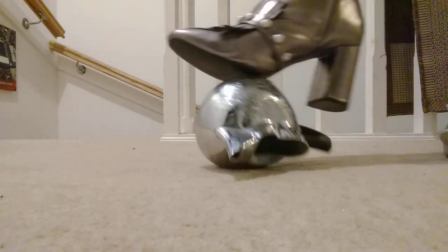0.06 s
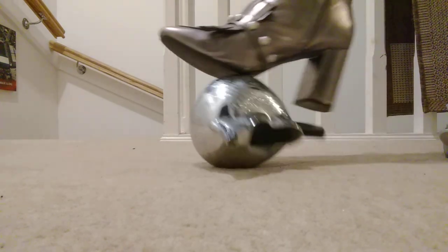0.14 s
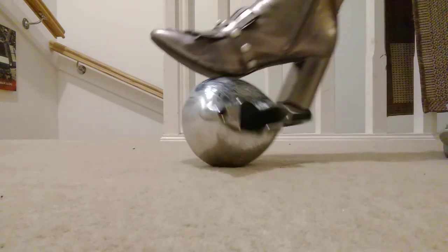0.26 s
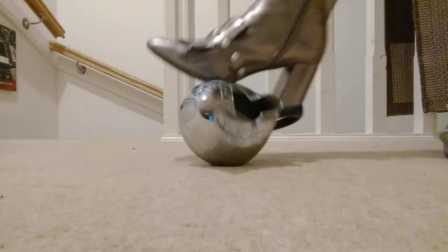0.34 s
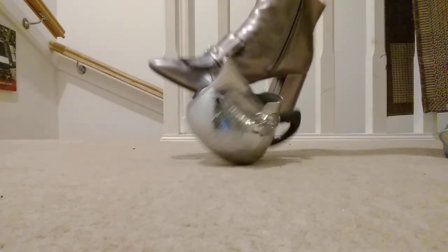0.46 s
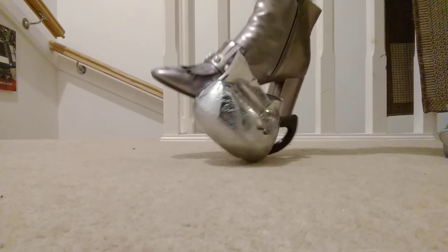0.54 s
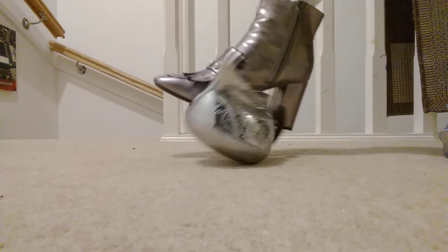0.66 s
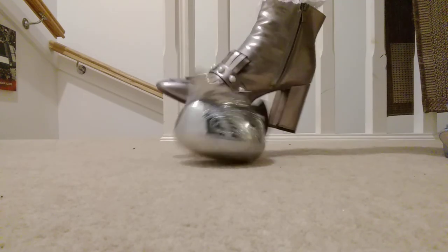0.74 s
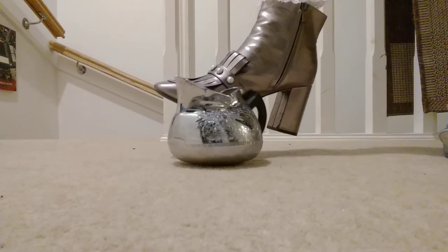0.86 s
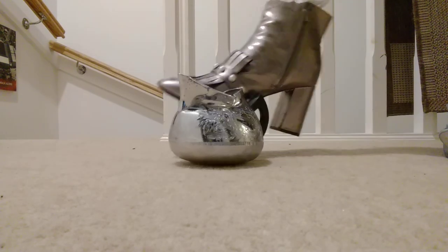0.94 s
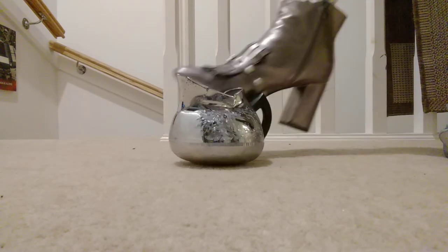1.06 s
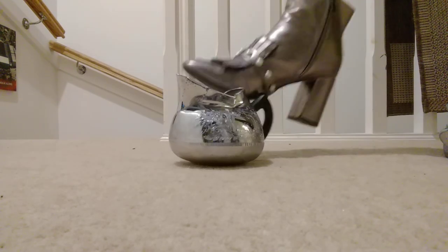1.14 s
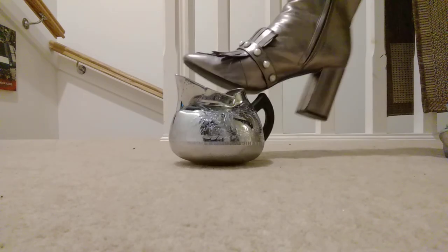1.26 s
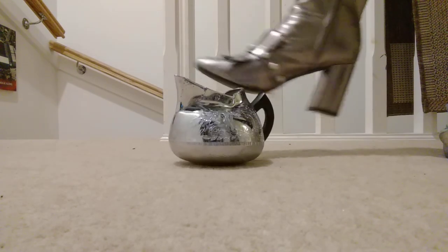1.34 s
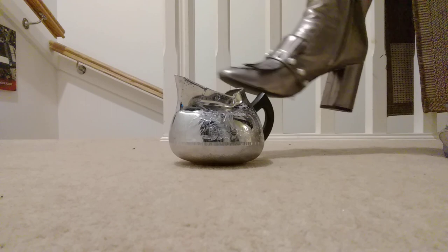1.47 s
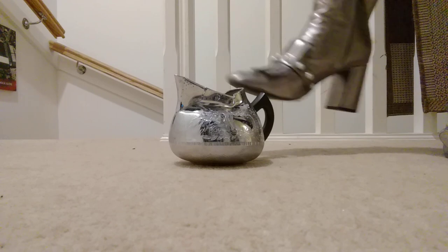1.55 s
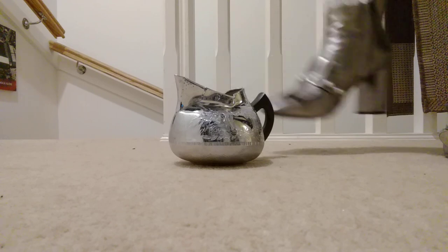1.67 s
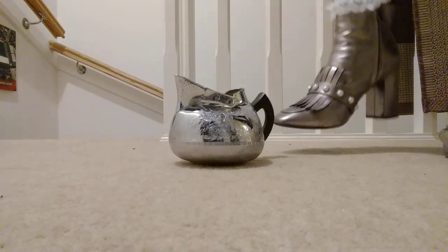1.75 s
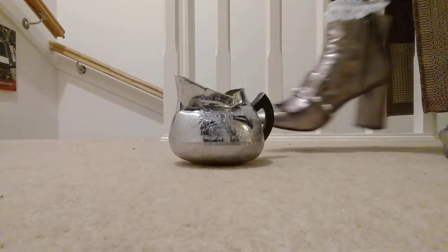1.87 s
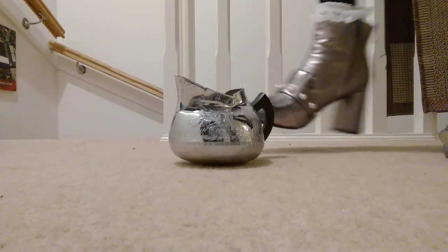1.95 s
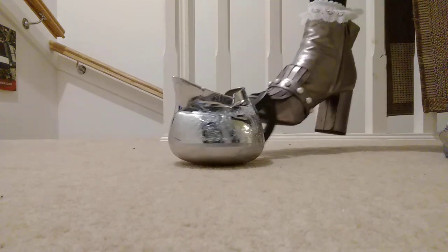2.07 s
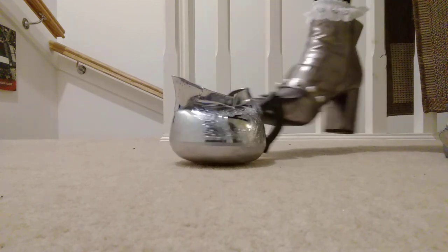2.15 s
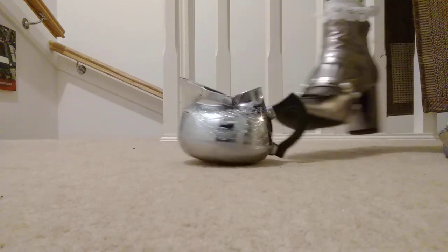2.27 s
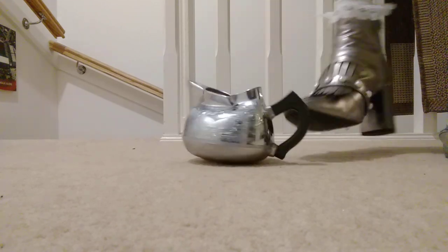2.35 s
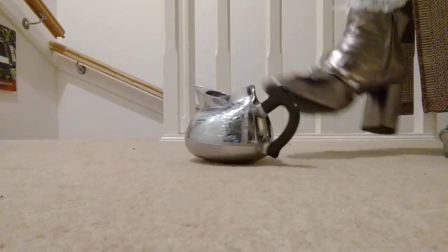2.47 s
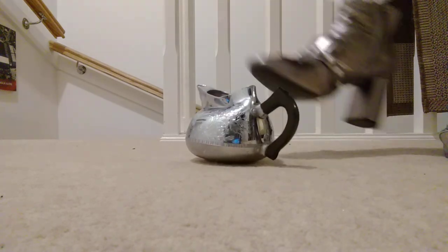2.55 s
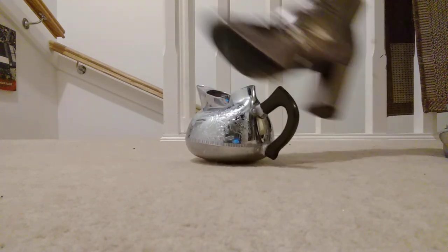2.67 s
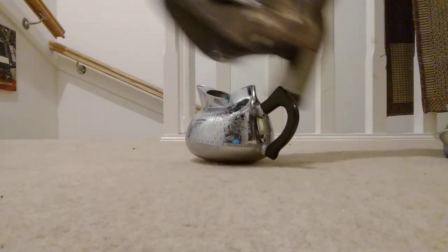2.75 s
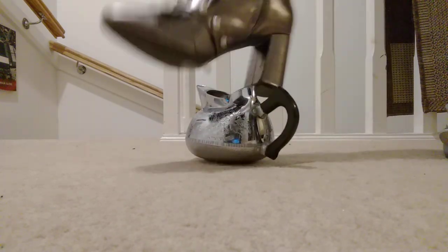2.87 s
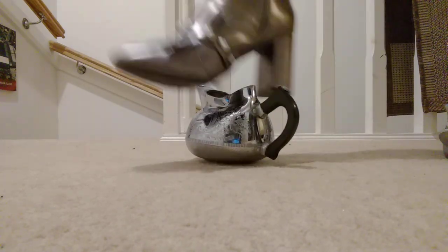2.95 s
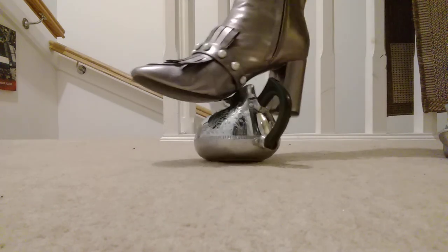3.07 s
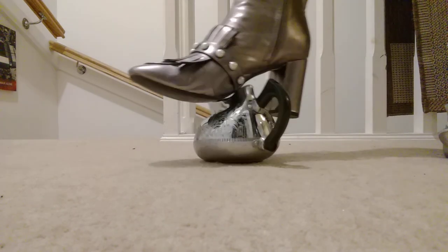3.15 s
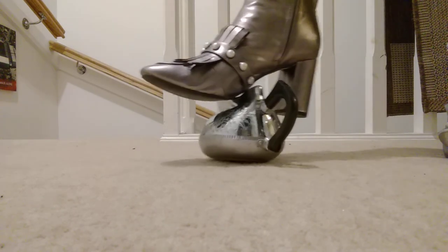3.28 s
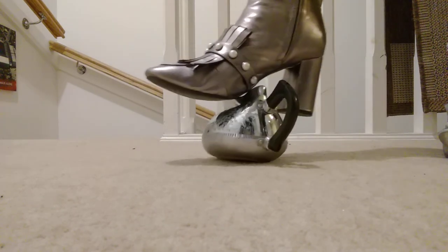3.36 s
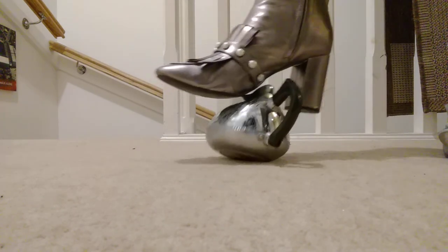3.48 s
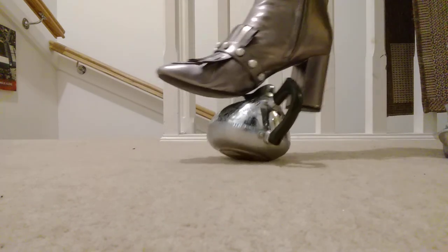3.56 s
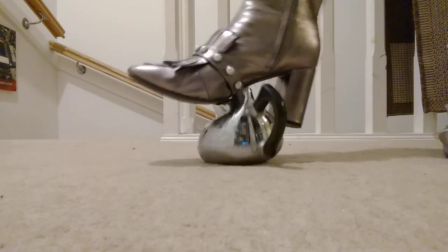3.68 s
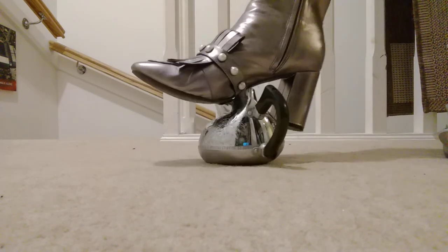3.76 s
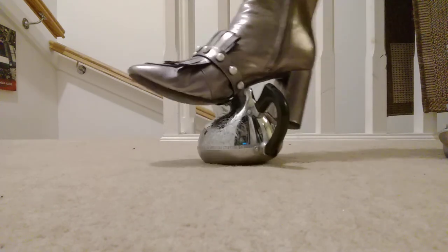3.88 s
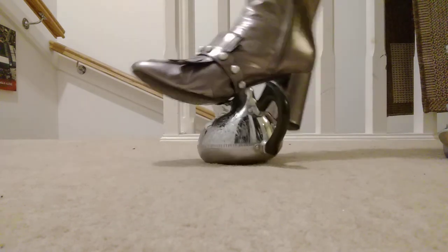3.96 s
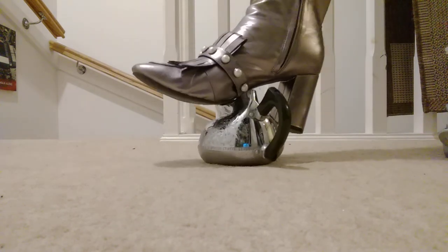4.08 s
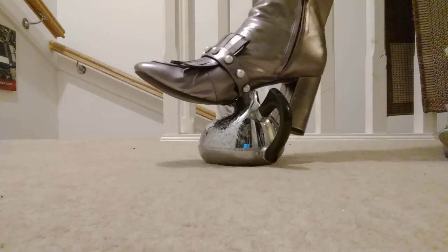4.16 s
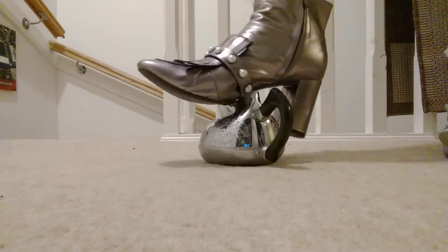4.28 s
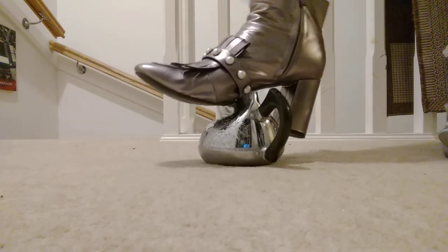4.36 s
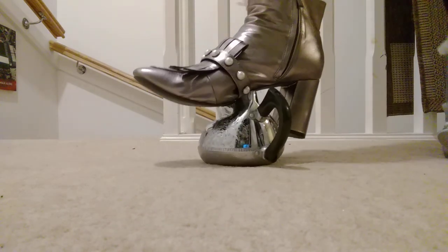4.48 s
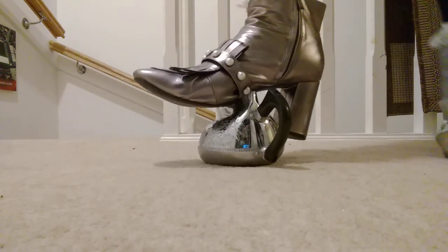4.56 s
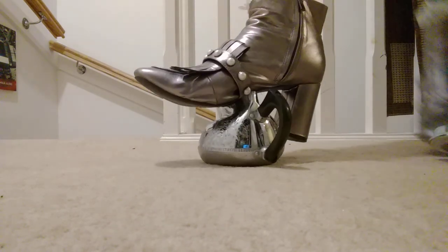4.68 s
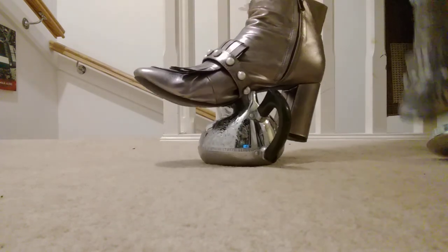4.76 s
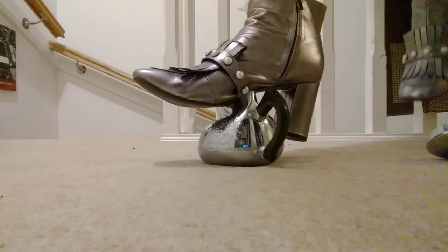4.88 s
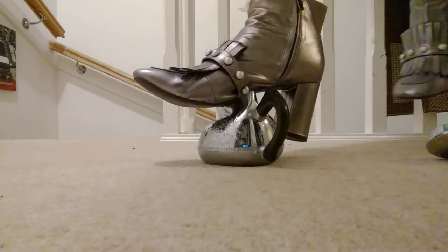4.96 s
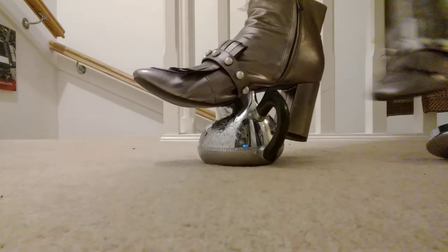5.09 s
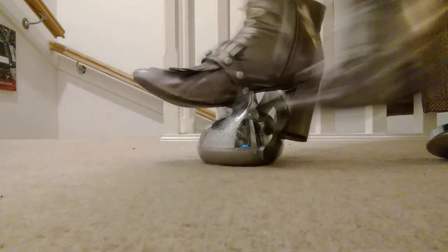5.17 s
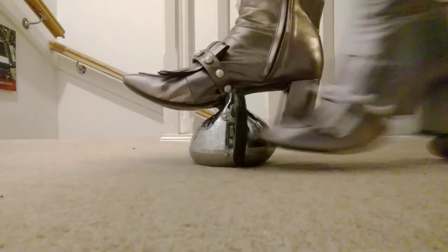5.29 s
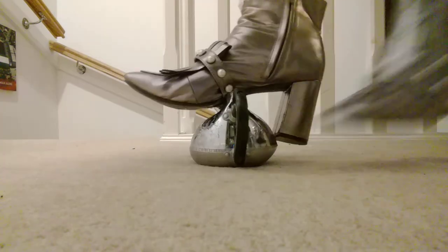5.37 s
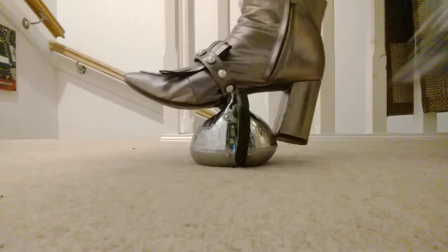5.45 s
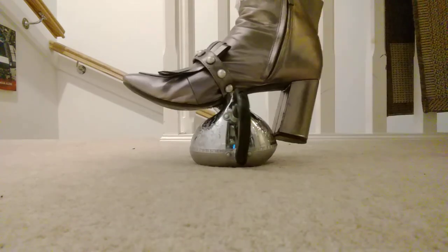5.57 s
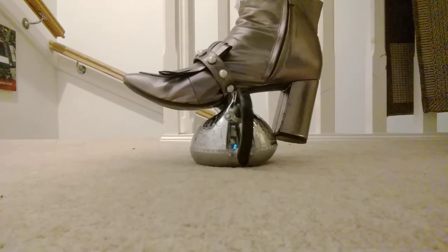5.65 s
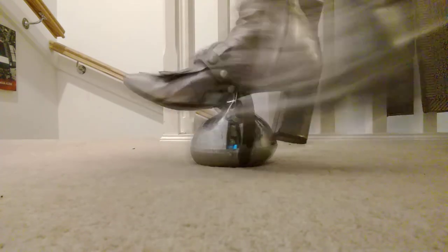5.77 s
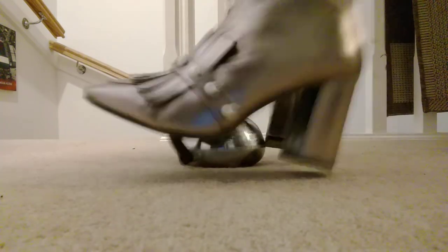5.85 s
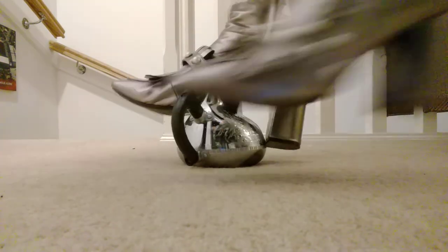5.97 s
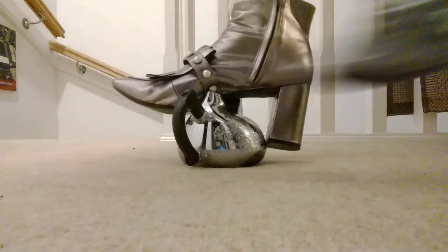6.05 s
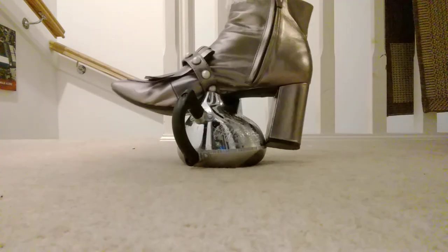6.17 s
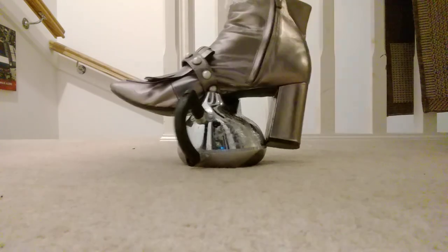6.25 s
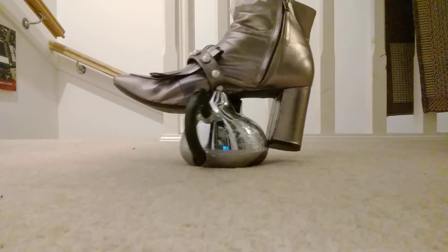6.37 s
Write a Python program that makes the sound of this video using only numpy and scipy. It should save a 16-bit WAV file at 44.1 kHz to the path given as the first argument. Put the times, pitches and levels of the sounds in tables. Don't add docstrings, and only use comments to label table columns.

```python
import sys
import numpy as np
from scipy import signal
from scipy.fft import rfft, irfft
from scipy.io import wavfile
from scipy.ndimage import uniform_filter1d

SR = 44100
rng = np.random.default_rng(int(sys.argv[2]) if len(sys.argv) > 2 else 0)


def put_to_file(sound):
    columns = np.atleast_2d(sound).T
    safe = np.clip(columns, -1, 1)
    whole_steps = np.round(safe * 32767)
    wavfile.write(sys.argv[1], SR, whole_steps.astype(np.int16))


def attenuation_scalar(level_db):
    decades = np.asarray(level_db, float) / 20
    return 10 ** decades


N = 283122


def blows(rows, modes, knock_s, thump_hz, thump_s, thump_width_s, boom_hz, boom_db, rise_cycles):
    out = np.zeros(N)
    for s, tick_db, knock_db, thump_db, ring_db in rows:
        add(out, s, tick(tick_db, 0.004))
        add(out, s + 0.0034, tick(tick_db - 16.5, 0.012))
        add(out, s, attenuation_scalar(knock_db + 2.0) * wavelet(1143, knock_s, 0.00064, 0.26))
        add(out, s, attenuation_scalar(thump_db + 4.5) * wavelet(thump_hz, thump_s, thump_width_s, 0.099))
        add(out, s, attenuation_scalar(thump_db + boom_db) * wavelet(boom_hz, 0.009, 0.0035, 0.2))
        add(out, s, attenuation_scalar(ring_db) * ringing(modes, rise_cycles))
    return out


FREE_HZ = [446, 797, 1194, 1508, 1672, 2290, 2390, 3130, 3910, 5240, 5669]
# (level [dB], t60 [s])
FREE_RING = [(2.5, 0.13), (-12, 0.35), (-1, 0.26), (-6, 0.19), (-1, 0.24), (7, 0.086), (-31, 0.24),
             (-9, 0.1), (-11.5, 0.071), (-24, 0.17), (-20, 0.14)]


def free_pot():
    return [(hz, *ring) for hz, ring in zip(FREE_HZ, FREE_RING)]


# (time [s], tick [dB], knock [dB], thump [dB], ring [dB])
FREE_BLOWS = [
    (0.738, -10.5, -24, -29, -30),
]


def free_blows():
    return blows(FREE_BLOWS, free_pot(), 0.00172, 373, 0.004, 0.00062, 165, -1.8, 0.36)


# (time [s], tick [dB], knock [dB], thump [dB], ring [dB])
RIM_BLOWS = [
    (0.9954, -9.5, -30.5, -46.5, -26),
]
RIM_HZ = [440, 797, 1500, 1742, 3066, 3606, 3872, 4700, 5158, 6035, 6346, 6690, 7492, 8870]
# (level [dB], t60 [s])
RIM_RING = [(-23.5, 0.15), (-20.5, 0.49), (-6, 0.035), (-17, 0.29), (-6.5, 0.25), (-11, 0.07), (-18, 0.2),
            (-5, 0.076), (-11.5, 0.18), (-12.5, 0.27), (-18, 0.11), (-12, 0.11), (-14, 0.23), (-2, 0.036)]


def rim_blows():
    rim = [(hz, *ring) for hz, ring in zip(RIM_HZ, RIM_RING)]
    return blows(RIM_BLOWS, rim, 0.00108, 590, 0.004, 0.00048, 210, -3.0, 0.44)


# (time [s], tick [dB], knock [dB], thump [dB], ring [dB])
PINNED_BLOWS = [
    (2.9705, -28, -29.5, -25, -37),
    (3.019, 3.5, -25.5, -25.5, -25.5),
    (3.5826, -28.5, -35, -43, -38.5),
    (3.6536, -1.5, -19, -11, -21),
]
# (frequency [Hz], level [dB], t60 [s])
PINNED_POT = [(82, -1.5, .18), (144, -4, 0.24), (389.8, -7, 0.4), (429, -10, 0.1), (393.8, 4, 0.081),
              (698, -4.5, 0.099), (1010, -13.5, 0.048)]


def pinned_blows():
    return blows(PINNED_BLOWS, PINNED_POT, 0.00121, 403.6, 0.00452, 0.0025, 130, 0.3, 0.53)


# (time [s], tick [dB], knock [dB], thump [dB], ring [dB])
KICKS = [
    (5.1648, 8, -10, -15.5, -36),
    (5.2792, -27, -45, -44, -43.5),
    (5.7632, 4, -9, -15, -26.5),
]
# (frequency [Hz], level [dB], t60 [s])
KICKED_POT = [(84, -3, 0.27), (145, -4.5, 0.23), (236.6, -2.5, 0.35), (332, -7.5, 0.29), (527, -6.5, 0.11),
              (782, -11, 0.1), (1010, -16, 0.039), (1160, -19, 0.059)]


def kick_blows():
    return blows(KICKS, KICKED_POT, 0.0015, 410, 0.0074, 0.0004, 175, -0.5, 2.2)


def ringing(modes, rise_cycles):
    t = np.arange(SR // 2) / SR
    out = np.zeros(len(t))
    for hz, db, t60 in modes:
        decay = attenuation_scalar(db - 60 * t / t60)
        swell = 1 - np.exp(-t * hz / rise_cycles)
        beating = 1 + 0.35 * np.cos(2 * np.pi * hz * 0.013 * t)
        out += decay * swell * np.sin(2 * np.pi * hz * t) * beating
    return out


def wavelet(hz, peak_s, width_s, glide):
    t = np.arange(SR // 20) / SR
    shape = (t / peak_s) ** (peak_s / width_s) * np.exp((peak_s - t) / width_s)
    bend = 1 - glide * np.tanh((t - peak_s) / peak_s)
    return shape * np.cos(2 * np.pi * hz * (t - peak_s) * bend)


# (frequency [Hz], level [dB])
TICK = [(1000, -33), (3000, -22.5), (6000, -28), (9000, -13), (10500, -4), (13500, 0.5), (14500, -1.5),
        (16200, -1)]


def tick(db, t60):
    t = np.arange(1024) / SR - 0.0009
    fade_db = -60 * np.where(t > 0, t / t60, -t / 0.0014)
    burst = coloured(rng.standard_normal(1024) * attenuation_scalar(fade_db), TICK)
    burst *= signal.windows.tukey(1024, 0.04)
    return attenuation_scalar(db) * burst / abs(burst).max()


# (time [s], level [dB], t60 [s], centre [Hz])
CLATTER = [(0.7372, -35.5, 0.3, 1548), (.995, -26, 0.2, 7070), (2.969, -33, 0.1, 2770),
           (3.0184, -18, 0.02, 3100), (3.049, -32.5, 0.15, 8160), (3.583, -38, 0.077, 2260),
           (3.654, -33, 0.08, 1160), (5.169, -20.5, 0.023, 870), (5.253, -54, .04, 5000),
           (5.279, -41.5, 0.072, 900), (5.765, -14, 0.042, 904), (5.1649, -18.5, 0.011, 2720),
           (5.168, -12, .02, 560), (5.766, -16.5, 0.017, 560), (3.164, -32.5, 0.016, 9000),
           (3.6522, -30, 0.023, 2960), (2.9965, -38, 0.053, 4500), (3.031, -32.5, 0.091, 5500)]


def clatter():
    out, t = np.zeros(N), np.arange(SR // 2) / SR
    f = np.geomspace(100, 20000, num=30)
    for s, db, t60, hz in CLATTER:
        spread, strength, life = rng.standard_normal((3, 70))
        noise, grain = rng.standard_normal((2, len(t)))
        grains = attenuation_scalar(2.5 * evened(uniform_filter1d(grain, 70)))
        hump = np.c_[f, -9.0 * np.log(f / hz) ** 2]
        crunch = evened(coloured(noise * grains, hump))
        crunch = crunch * attenuation_scalar(-60 * t / t60) * np.minimum(t / 0.00029, 1)
        if s < 2:
            crowd_hz = 11000 * np.tanh(hz * np.exp(0.67 * spread) / 11000)
            crowd_t60 = t60 * np.exp(np.tanh(life) / 2)
            crowd = ringing(zip(crowd_hz, 1.9 * strength, crowd_t60), 1.5)
            crunch = crunch + 2.0 * crowd / abs(crowd).max()
        add(out, s, attenuation_scalar(db - 7.5) * crunch)
    return out


# (time [s], level [dB], frequency [Hz])
CRACKS = [
    (2.972, -39, 3100),
    (3.0192, -29, 3230),
    (3.5826, -44, 3300),
    (3.6556, -23, 2590),
    (5.1653, -15, 2670),
    (5.252, -57, 3500),
    (5.281, -58, 3220),
    (5.7638, -22.5, 2590),
]


def cracks():
    out = np.zeros(N)
    for s, db, hz in CRACKS:
        add(out, s, attenuation_scalar(db) * wavelet(hz, 0.0007, 0.0005, 0.05))
    return out


# (time [s], tick [dB], knock [dB])
CLICKS = [(1.1087, -53, -39), (1.42, -32.5, -68), (1.8008, -28, -63), (1.8104, -32.5, -45),
          (1.8748, -31, -56), (1.9495, -25.5, -52), (2.7777, -41, -51), (2.8734, -20.5, -38.5),
          (3.0443, -19.5, -30.5), (3.1492, -32, -50), (3.1643, -30, -35), (3.749, -46, -41.5),
          (3.8183, -38, -46), (4.013, -33, -49), (4.0234, -65, -43), (4.1764, -36, -55),
          (4.2905, -30, -53.5), (5.1951, -38.5, -43), (5.2525, -24.5, -55.5), (5.3093, -28, -44)]


def clicks():
    out = np.zeros(N)
    for s, tick_db, knock_db in CLICKS:
        add(out, s, tick(tick_db, 0.015))
        add(out, s, attenuation_scalar(knock_db - 6) * wavelet(1150, 0.0013, 0.0027, 0.095))
    return out


SINGING_S = [5.29, 5.31, 5.3, 5.278, 5.312, 3.044, 2.975, 1.15]
SINGING_HZ = [1529, 2756, 4630, 2080, 2060, 10550, 1198, 11682]
# (level [dB], swell [s], t60 [s])
SINGING = [
    (-55, 0.14, 0.3),
    (-54, 0.022, 0.25),
    (-50, 0.013, 0.2),
    (-50.5, 0.0081, 0.12),
    (-52, 0.0055, 0.05),
    (-27, .004, 0.081),
    (-27, 0.0029, 0.057),
    (-67, 0.28, 7.2),
]


def singing():
    out, t = np.zeros(N), np.arange(SR) / SR
    for s, hz, (db, swell, t60) in zip(SINGING_S, SINGING_HZ, SINGING):
        rise = np.minimum(t / swell, 1)
        decay = attenuation_scalar(db - 60 * np.maximum(t - swell, 0) / t60)
        fade = signal.windows.tukey(SR, 0.2 * (t60 > 2))
        add(out, s, rise * decay * fade * np.sin(2 * np.pi * hz * t))
    return out


# (time [s], peak [dB], frequency [Hz], t60 [s])
BUMPS = [
    (2.034, -43, 410, 0.033),
    (4.067, -28.5, 156, 0.031),
    (4.241, -40, 145, 0.3),
    (4.304, -28, 126, 0.075),
    (4.538, -28, 148, 0.038),
    (5.634, -45, 108.6, 0.067),
]


def bumps():
    out = np.zeros(N)
    for s, db, hz, t60 in BUMPS:
        add(out, s, ringing([(hz, db, t60)], 0.48))
    return out


# (peak time [s], half length [s], hiss [dB], scrape [dB], weight [dB])
STROKES = [(0.05, .4, -48, -68, -71), (0.37, .12, -36, -52, -63), (0.5, 0.13, -55.5, -66, -61),
           (0.84, 0.11, -54, -61, -55), (1.12, .18, -55, -62, -62.5), (1.64, .3, -71.5, -75, -72),
           (2.05, 0.14, -67, -60.5, -59), (2.2, 0.17, -51.5, -60.5, -71), (2.42, 0.11, -56, -68, -72.5),
           (2.86, 0.07, -60.5, -89, -83), (3.02, 0.069, -32, -44, -62), (3.27, 0.23, -43.5, -55, -51),
           (3.66, 0.076, -42.5, -50, -56), (3.9, 0.38, -64.5, -74.5, -63.5),
           (4.26, 0.28, -65, -73.5, -60.5), (4.56, 0.23, -57, -58.5, -55.5), (5.0, .35, -59.5, -69.5, -70),
           (5.26, 0.16, -59, -65, -57), (5.89, 0.14, -67.5, -67.5, -60), (6.046, 0.15, -66, -78.5, -72)]
REST_DB = [-67, -86, -77]


def strokes():
    t = np.arange(0, N + 64, 64) / SR
    s, half, *levels = np.transpose(STROKES)
    away = abs(t[:, None] - s) / half
    shape = attenuation_scalar(-2 * 14 * away ** 1.3)
    gains = []
    for db, rest_db in zip(levels, REST_DB):
        stroke = np.interp(np.arange(N) / SR, t, np.sqrt(shape @ attenuation_scalar(2 * db)))
        gains.append(stroke + attenuation_scalar(rest_db) * adapted())
    return gains


# (frequency [Hz], level [dB per Hz])
FIBRES = [(5000, -29.5), (8000, -18.5), (9500, -5.5), (10500, -6), (12000, 5.5), (13500, -3.5),
          (14200, -0.5), (14600, -76)]
# (frequency [Hz], level [dB per Hz])
SCRAPE = [(250, -24.5), (450, -3.5), (1700, -7), (2500, -6), (5000, -28.5), (8000, -18), (14000, -43),
          (14600, -97)]
# (frequency [Hz], level [dB per Hz])
RUMBLE = [(30, -28), (60, -3.5), (100, 4.5), (160, 1), (300, -11), (450, -17.5), (700, -36.5)]


def rubbing():
    hiss_gain, scrape_gain, weight_gain = strokes()
    t = np.arange(N) / SR
    grain = attenuation_scalar(2.0 * evened(uniform_filter1d(rng.standard_normal(N), 90)))
    fibre_noise, pot_noise, board_noise = rng.standard_normal((3, N))
    hiss = evened(coloured(fibre_noise * grain, FIBRES))
    scrape = evened(coloured(pot_noise * grain, SCRAPE))
    free = evened(signal.oaconvolve(pot_noise, ringing(free_pot(), 1.0))[:N])
    pinned = evened(signal.oaconvolve(pot_noise, ringing(PINNED_POT[2:4], 1.1))[:N])
    woken = free * (t < 2.6) + 0.55 * pinned * (abs(t - 3.65) < 0.65)
    lumps = attenuation_scalar(0.76 * evened(uniform_filter1d(rng.standard_normal(N), 1500)))
    rumble = evened(lumps * coloured(board_noise, RUMBLE))
    return (hiss_gain * hiss + scrape_gain * attenuation_scalar(2.0) * (scrape + 0.76 * woken)
            + weight_gain * attenuation_scalar(7.0) * rumble)


# (frequency [Hz], t60 [s])
LANDING = [(100, 0.41), (300, 0.34), (1000, 0.24), (3000, 0.18), (10000, 0.23)]


def landing(x):
    hz, t, z = signal.stft(rng.standard_normal((2, SR // 2)), SR, nperseg=256)
    decay = attenuation_scalar(-60 * t / read(LANDING, hz)[:, None])
    tail = signal.istft(z * decay, SR, nperseg=256)[1]
    tail *= np.clip((np.arange(tail.shape[1]) / SR - 0.004) / 0.019, 0, 1)
    return signal.fftconvolve(x[None], tail / np.linalg.norm(tail[0]), axes=1)[:, :N]


# (frequency [Hz], level [dB per Hz])
HISS = [(60, 2.5), (150, 17), (600, 7.5), (1500, 1), (3000, -2), (10000, -2), (14200, -1), (14600, -73)]


def background():
    return attenuation_scalar(-59) * adapted() * evened(coloured(rng.standard_normal((2, N)), HISS))


def adapted():
    turn = np.tanh((np.arange(N) / SR - 5.3) / 0.04)
    return attenuation_scalar(-10.5 * (0.5 + 0.5 * turn))


def read(points, hz):
    f, value = np.transpose(points)
    return np.interp(np.log(hz + 1), np.log(f + 1), value)


def evened(x):
    return x / np.sqrt(np.mean(x ** 2) + 1e-20)


def add(mix, s, sound):
    part = mix[round(s * SR):][:len(sound)]
    part += sound[:len(part)]


def coloured(x, points):
    size = x.shape[-1]
    return irfft(rfft(x) * attenuation_scalar(read(points, np.fft.rfftfreq(size, 1 / SR))), size)


# (frequency [Hz], level [dB])
FAR_PORT = [(100, 3.5), (450, 3.5), (650, 0), (900, -12), (1600, -20), (14000, -30)]
# (frequency [Hz], level [dB])
BOARDS = [(100, -4), (450, -5), (700, -12.5), (1200, -39.5)]
# (frequency [Hz], level [dB])
SKIRTING = [(3000, -38), (7000, -13.5), (14000, -13)]
# (frequency [Hz], level [dB])
SOFT_WALLS = [(100, -6), (600, -3), (2000, -19), (4000, -9.5), (9000, -13), (14000, -15), (14600, -44)]


def scene():
    kicks = kick_blows()
    hits = free_blows() + rim_blows() + pinned_blows() + kicks
    hits += clatter() + cracks() + clicks() + singing() + bumps()
    rub = rubbing()
    near = hits + rub
    skirting = coloured(np.roll(rub, shift=900), SKIRTING)
    far = coloured(near, FAR_PORT) + coloured(kicks, BOARDS) + skirting
    tail = attenuation_scalar(-10) * landing(coloured(hits, SOFT_WALLS))
    return np.array([far, near]) + tail + background()


def drop_weaker(x):
    pair = signal.stft(np.array([x[0] + x[1], x[0] - x[1]]) / 2, nperseg=1024)[2]
    power = uniform_filter1d(abs(pair) ** 2, size=7, axis=1)
    total = power.sum(0)
    quiet = total < attenuation_scalar(13) * np.median(total, axis=1, keepdims=True)
    weaker = power < attenuation_scalar(-12.5) * power[::-1]
    above_bass = (np.arange(513) > 16)[:, None]
    pair = pair * ~(quiet & weaker & above_bass)
    mid, side = signal.istft(pair, nperseg=1024)[1][:, :N]
    return np.array([mid + side, mid - side])


def roll_off(x):
    return signal.sosfilt(signal.butter(12, 16040, fs=SR, output="sos"), x)


# (frequency [Hz], level [dB])
TOP_EDGE = [(14200, 0), (14550, -26), (16500, -30)]
# (frequency [Hz], share [0-1])
CROSSFEED = [(60, .78), (300, .82), (1100, .66), (2300, .84), (5000, .86), (7000, .56), (14000, .36)]


def record(dry):
    hz = np.fft.rfftfreq(N, 1 / SR)
    ports = rfft(dry) * attenuation_scalar(read(TOP_EDGE, hz))
    delay = np.exp(-2j * np.pi * hz / 2357)
    across = np.clip(read(CROSSFEED, hz), 0, 1) * delay
    wide = drop_weaker(irfft(ports - across * ports[::-1], N))
    return roll_off(np.clip(wide, -1, 1))


dry = scene()
out = record(dry)
put_to_file(out)
```